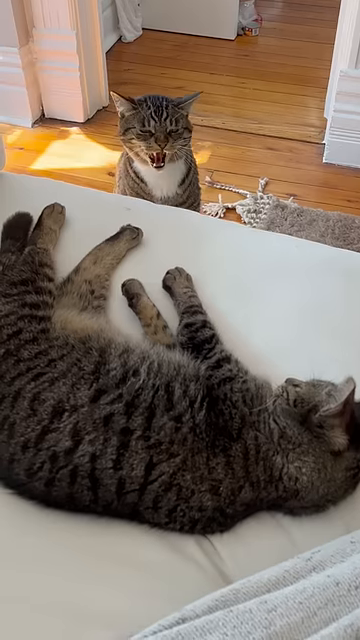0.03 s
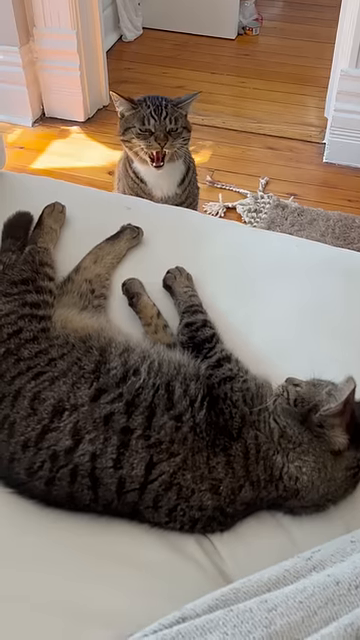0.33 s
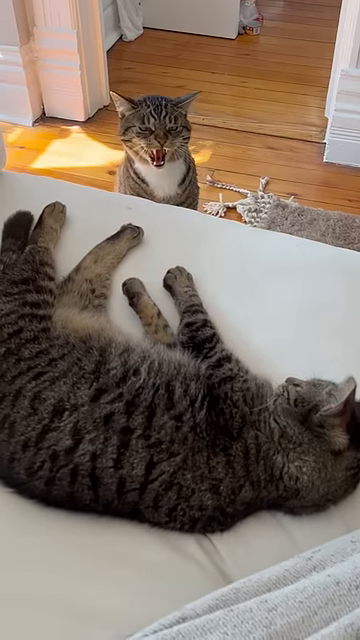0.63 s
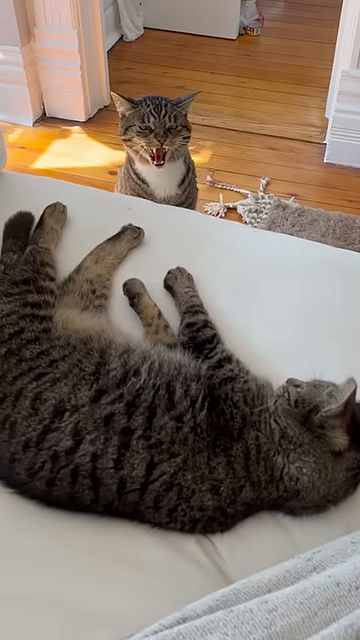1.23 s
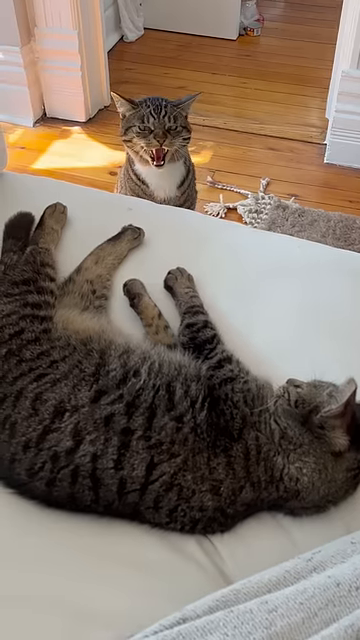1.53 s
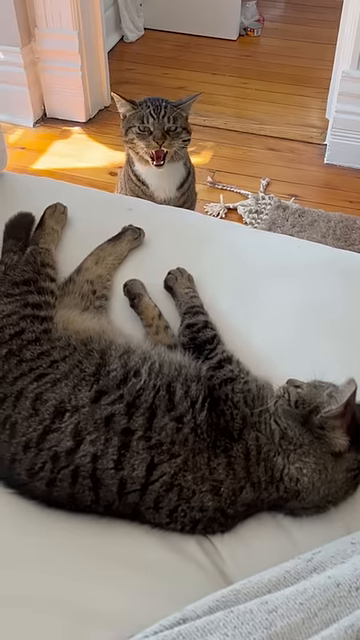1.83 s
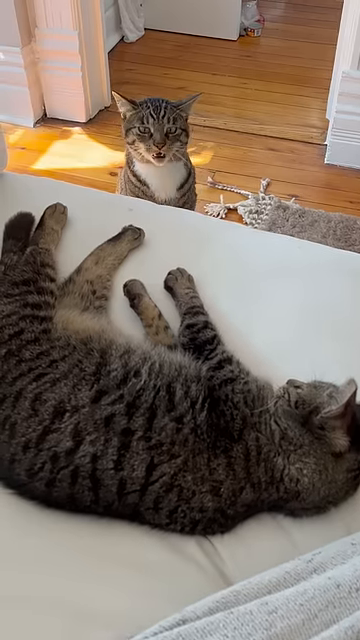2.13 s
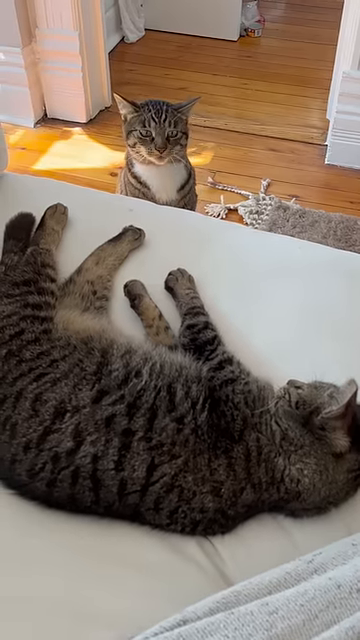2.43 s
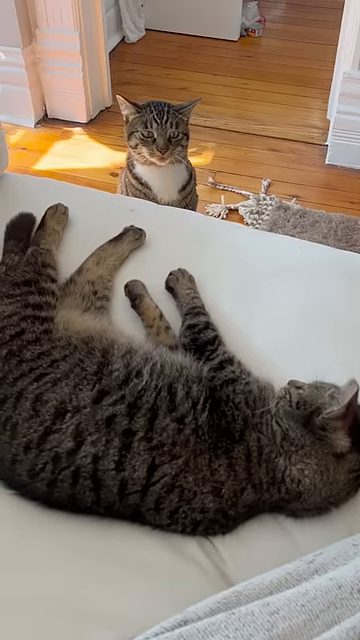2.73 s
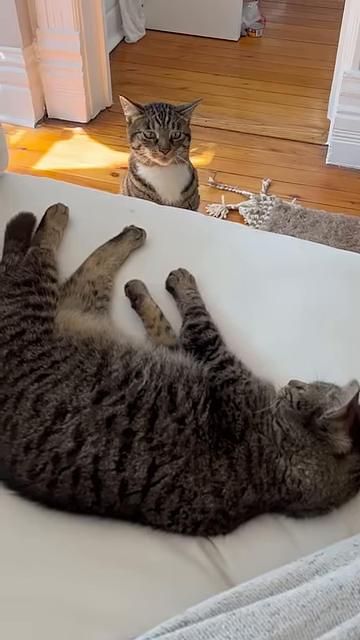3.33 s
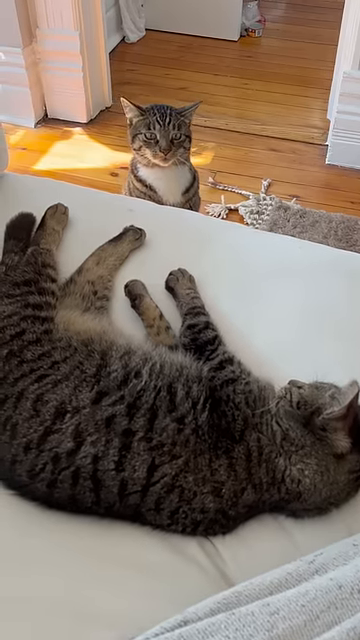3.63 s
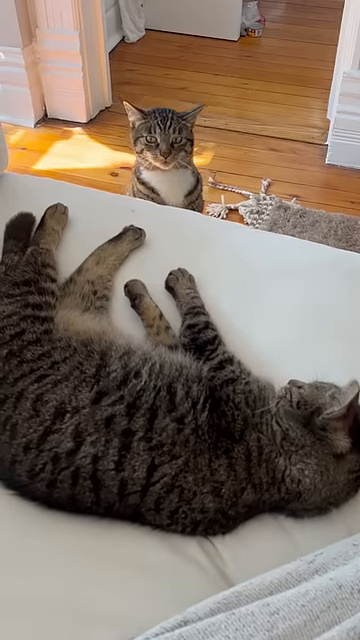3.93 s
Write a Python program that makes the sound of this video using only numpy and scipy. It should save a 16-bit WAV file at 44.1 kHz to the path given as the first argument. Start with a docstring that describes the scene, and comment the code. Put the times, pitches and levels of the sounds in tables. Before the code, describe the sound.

One long, breathy cat hiss with a wet sizzle, followed by a quiet room's low rumble.

```python
"""One long cat hiss

A cat hisses in a quiet room with a wooden floor, then shuts its mouth. Breath rushes through
the throat and the open mouth; saliva flutters in it, about sixty spits a second, and sizzles past
the teeth. The room rings briefly, leaving a low rumble, a faint drone and soft air noise."""
import sys
import numpy as np
from scipy import signal
from scipy.fft import rfft, irfft
from scipy.io import wavfile
from scipy.ndimage import map_coordinates

SR = 44100
rng = np.random.default_rng(int(sys.argv[2]) if len(sys.argv) > 2 else 0)


def log_audio(samples):
    """Write samples as a 16-bit WAV file to the path given in sys.argv[1]."""
    # one column per channel
    frames = np.atleast_2d(samples).T
    # limit to full scale, then quantise
    limited = np.clip(frames, -1, 1)
    pcm = np.round(limited * 32767).astype(np.int16)
    wavfile.write(sys.argv[1], SR, pcm)


N = 176400
T = np.arange(N) / SR
HZ = np.maximum(np.arange(N // 2 + 1) * SR / N, 1)
MOUTH_SHUT_S = 1.81


# Push of the breath, before each layer's trim: time_s, low_throat_db, upper_throat_db, mouth_db
BREATH_PUSH = [(0, -49.5, -59.5, -63), (.14, -50, -53, -62.5), (.21, -51.5, -55, -62), (.35, -51, -54, -62),
               (.53, -47.5, -51.5, -58.5), (.62, -50.5, -54.5, -59), (.77, -51, -55.5, -60.5),
               (.88, -51.5, -53, -59.5), (.97, -52.5, -58, -63), (1.11, -53, -53, -61),
               (1.21, -51.5, -57.5, -62.5), (1.31, -51, -55, -60.5), (1.39, -51, -62.5, -63.5),
               (1.47, -50.5, -52.5, -61.5), (1.55, -51.5, -60.5, -62.5), (1.66, -54, -54.5, -60.5),
               (1.73, -51, -51.5, -58.5), (1.8, -59, -59, -62)]
# Dark colour of the throat: frequency_hz, gain_db
THROAT_COLOUR = [(85, -6), (120, 5), (170, -6), (255, 0), (335, 0), (400, 0), (470, -1.5), (600, -4),
                 (790, -3.5), (950, -12.5), (1200, -16.5), (1450, -18.5), (1900, -32), (4000, -48),
                 (6500, -50)]

def throat(puffs, roughness=.28, split_hz=593):
    """A hollow rush from deep in the throat; its upper part swells when the cat pushes harder."""
    low_db, upper_db, _ = in_time(BREATH_PUSH)
    rush = coloured(rng.standard_normal(N) * (1 + roughness * puffs), THROAT_COLOUR)
    low = irfft(rfft(rush) / (1 + (HZ / split_hz) ** 10), N)
    rush = unit_power(low) * from_db(low_db + 2) + unit_power(rush - low) * from_db(upper_db - 1)
    unsteady_airflow = waver(depth_db=1.5, rate_hz=22.5)
    return rush * unsteady_airflow * release(t60_s=.3)


# Formants of the wide-open mouth: pitch_hz, width_hz, gain_db
MOUTH_FORMANTS = [(2020, 1520, 2.5), (2450, 620, 2), (2530, 250, -4), (2938, 290, -6.5), (3560, 250, -9)]

def mouth(puffs, roughness=.24):
    """Turbulence rings in the mouth's resonances, which flicker and stray as tongue and jaw tremble."""
    _, _, mouth_db = in_time(BREATH_PUSH)
    rush = sum(from_db(db) * waver(depth_db=1.7, rate_hz=54) * wander(noise_band(hz, width), share=.05)
               for hz, width, db in MOUTH_FORMANTS)
    return unit_power(rush * (1 + roughness * puffs)) * from_db(mouth_db + 1) * release(t60_s=.22)


# Ride of the sizzle and its topmost ring: time_s, sizzle_db, top_db, tilt_db_per_octave
SIZZLE_RIDE = [(0, -60, -55, -7), (.18, -64.5, -60, -3), (.42, -58, -55, -12), (.62, -57, -57, 0),
               (.76, -56.5, -55, -9), (.87, -55.5, -56, 0), (.98, -59, -55, 0), (1.12, -55.5, -56, 4),
               (1.36, -54.5, -53.5, 2.5), (1.54, -58, -62, 7), (1.68, -52, -63.5, 13), (1.78, -62, -70, 0)]
# Resonances of the gaps between the teeth: pitch_hz, width_hz, gain_db
TOOTH_GAPS = [(7500, 300, -7.5), (8160, 850, 2), (9650, 650, 4.5), (11100, 1200, -5), (12360, 380, 1),
              (13700, 540, -7.5)]

def teeth(puffs, accent_db, spit_tilt_db, low_edge_hz=7050, leak_db=-25.5):
    """Each puff spits noise through the teeth, with a colour of its own, over a steady fine spray."""
    sizzle_db, top_db, tilt_db = in_time(SIZZLE_RIDE)
    spits, spray = from_db(.5) * puffs, from_db(-5)
    spit_jets = spits * from_db(accent_db) * gap_shares(tilt_db + spit_tilt_db)
    jets = np.hypot(spit_jets, spray * gap_shares(tilt_db))
    rings = np.zeros(N)
    for jet, (hz, width, _) in zip(jets, TOOTH_GAPS):
        flicker = waver(depth_db=1.3, rate_hz=30)  # saliva keeps changing the gaps
        ring = wander(resonate(rng.standard_normal(N), hz, width), share=.008)
        rings += jet * flicker * unit_power(ring)
    bright = signal.sosfilt(signal.butter(20, low_edge_hz, "high", fs=SR, output="sos"), rings)
    flow = np.hypot(spits, spray)
    sizzle = bright + from_db(leak_db) * flow * rng.standard_normal(N)
    top_ring = flow * noise_band(hz=15470, width_hz=1400)
    return (sizzle * from_db(sizzle_db) + top_ring * from_db(top_db)) * release(t60_s=.025)


def gap_shares(tilt_db):
    """How the jet divides among the tooth gaps at a given tilt per octave; unit power."""
    gains = np.array([from_db(db + tilt_db * np.log2(hz)) for hz, _, db in TOOTH_GAPS])
    return gains / np.linalg.norm(gains, axis=0)


# Spits that stand out as wet ticks: start_s, accent_db, tilt_db_per_octave
WET_TICKS = [(.029, 0, -5), (0.186, 4, 15), (.217, 8.5, 10), (.381, 2, -10), (.422, 1.5, -11),
             (.511, 2, 25), (0.525, -3, -1), (0.728, -1, -7), (.744, 1, -6), (.843, 3.5, 8), (.881, 3, 9),
             (.898, 4, -17), (1.028, 2, 10), (1.094, 3, 10), (1.156, 0.5, 3), (1.271, -0.5, -20),
             (1.284, 0, -8), (1.383, 1.5, 9), (1.482, 1, -3), (1.517, 5, -6), (1.602, 1, -2), (1.616, 1, 4),
             (1.653, 0.5, 10), (1.685, -2, 8), (1.772, 1.5, 4)]

def flutter(rate_hz=62, jitter_cycles=.13, size_range_db=7, tilt_spread_db=7, puff_width_s=.0011):
    """Saliva flaps in the breath: uneven puffs in step with the wet ticks, plus their accent and tilt."""
    tick_s, tick_db, tick_tilt_db = np.transpose(WET_TICKS)
    marks_s = np.r_[0, tick_s, T[-1]]
    flaps_between = np.maximum(np.round(np.diff(marks_s) * rate_hz), 1)
    cycles = np.r_[0, np.cumsum(flaps_between)].astype(int)
    count, ticks = cycles[-1], cycles[1:-1]
    late, tilt_db = rng.standard_normal((count, 2)).T * [[jitter_cycles], [tilt_spread_db]]
    size_db, accent_db = -size_range_db * rng.random(count), np.zeros(count)
    late[ticks] = size_db[ticks] = 0  # ticks land on time and at full size
    accent_db[ticks], tilt_db[ticks] = tick_db, tick_tilt_db
    puff_s = np.interp(np.arange(count) + late, cycles, marks_s)
    clicks = np.zeros(N)
    clicks[(puff_s * SR).astype(int)] = from_db(size_db)
    lag_s = np.arange(-SR // 100, SR // 100) / SR
    puff_shape = 1 / np.cosh(lag_s / puff_width_s * np.pi / 2)
    puffs = unit_power(signal.fftconvolve(clicks, puff_shape, "same"))
    return puffs, np.interp(T, puff_s, accent_db), np.interp(T, puff_s, tilt_db)


def release(t60_s):
    """Full until the mouth shuts, then dying away."""
    return np.exp(-np.log(1000) * np.maximum(T - MOUTH_SHUT_S, 0) / t60_s)


def wander(x, share, rate_hz=9):
    """The pitch of a resonance strays as tongue and jaw move."""
    return map_coordinates(x, [np.cumsum(1 + share * drift(rate_hz))], mode="mirror")


# Stereo image of the cat, as the phase lead of left over right: frequency_hz, lead_rad
LEFT_LEAD = [(100, 0.3), (2200, -0.81), (2900, 1), (3600, 0.4), (5000, 1), (7400, -1.86), (11000, -1.12),
             (15800, -1.83)]

def room(x, wet_db, t60_s, predelay_s=.0023):
    """Direct sound reaches left and right, followed by the room's short diffuse tail."""
    arrivals = irfft(np.exp(.5j * over_hz(LEFT_LEAD) * np.array([[1], [-1]])), N)
    arrivals = np.roll(arrivals, 128, axis=1)[:, :257]  # short, centred impulse responses
    direct = np.array([signal.fftconvolve(x, side, "same") for side in arrivals])
    t = T[:SR // 2]
    tail = diffuse_noise()[:, :len(t)] * np.exp(-np.log(1000) * t / t60_s) * (t > predelay_s)
    tail /= np.linalg.norm(tail, axis=1, keepdims=True)
    wet = signal.fftconvolve(x[None], tail, axes=1)[:, :N]
    return (direct + from_db(wet_db) * wet) / np.hypot(1, from_db(wet_db))


# Low room modes, before the swell: pitch_hz, width_hz, level_db
ROOM_MODES = [(60.86, 18, -48.5), (42.4, 26, -57)]
# Swell of the building's rumble: time_s, gain_db
RUMBLE_SWELL = [(0, -3.5), (.33, 4.5), (.5, 1.5), (.85, -4.5), (1.08, 4), (1.3, -4), (1.65, -2.5),
                (2.0, 0.5), (2.18, 4), (2.3, -7), (2.5, 1.5), (2.83, -3), (2.9, 8.5), (2.96, -7.5),
                (3.02, -10), (3.14, 1.5), (3.35, -13), (3.75, 1), (4, -3)]

def rumble(unevenness=.4):
    """The building excites the low room modes; their chance beating is partly evened out."""
    modes = sum(from_db(db) * noise_band(hz, width) for hz, width, db in ROOM_MODES)
    envelope = np.sqrt(np.abs(signal.hilbert(modes)) ** 2 + unevenness * np.mean(modes ** 2))
    return unit_power(modes / envelope) * np.std(modes) * from_db(in_time(RUMBLE_SWELL)[0])


# Bands of the house drone, before the waver: pitch_hz, width_hz, level_db
DRONE_BANDS = [(228.7, 20.4, -66), (326, 39, -69.5)]

def drone():
    """The house drones faintly in two narrow bands that come and go."""
    bands = sum(from_db(db) * noise_band(hz, width) for hz, width, db in DRONE_BANDS)
    return bands * waver(depth_db=3, rate_hz=5.6)


# Colour of the room tone: frequency_hz, gain_db
AIR_COLOUR = [(25, -9.5), (90, 0.5), (122, -0.5), (145, -6.5), (240, -5), (280, -13.5), (340, -12),
              (390, -20.5), (510, -21.5), (800, -28.5), (1240, -32), (2500, -37.5), (6200, -40.5),
              (8500, -44), (10000, -50.5), (13000, -48), (14300, -79)]

def air(level_db=-53.5):
    """Faint, dark air noise fills the room."""
    return from_db(level_db) * coloured(diffuse_noise(), AIR_COLOUR)


# Likeness of left and right in the diffuse sound: frequency_hz, correlation
STEREO_LIKENESS = [(80, 0.97), (200, 0.9), (400, 0.11), (1000, 0.033), (4000, 0.47), (12000, 0.19)]

def diffuse_noise():
    """Noise from all around: alike on both sides in the bass, less so higher up."""
    alike = np.clip(over_hz(STEREO_LIKENESS), 0, 1)
    mid, side = rfft(rng.standard_normal((2, N)))
    return irfft(np.sqrt(1 + alike) * mid + np.sqrt(1 - alike) * side * [[1], [-1]], N)


def from_db(db):
    """Decibels to gain."""
    return 10 ** (np.asarray(db) / 20)


def unit_power(x):
    """Scale to an RMS of one."""
    return x / np.sqrt(np.mean(x ** 2) + 1e-20)


def in_time(rows):
    """Each column of an automation curve, sample by sample."""
    time_s, *columns = np.transpose(rows)
    return [np.interp(T, time_s, column) for column in columns]


def over_hz(points):
    """Points joined by straight lines over log frequency."""
    hz, value = np.transpose(points)
    return np.interp(np.log(HZ), np.log(hz), value)


def coloured(x, spectrum):
    """Give noise a colour that falls away below its lowest point; unit power."""
    gain = from_db(over_hz(spectrum)) * np.minimum(HZ / spectrum[0][0], 1) ** 4
    return unit_power(irfft(rfft(x) * gain, N))


def resonate(x, hz, width_hz):
    """One resonance with unit gain at its peak."""
    r = np.exp(-np.pi * width_hz / SR)
    feedback = [1, -2 * r * np.cos(2 * np.pi * hz / SR), r * r]
    return signal.lfilter(np.array([1, 0, -1]) * (1 - r * r) / 2, feedback, x)


def noise_band(hz, width_hz):
    """Noise sent twice through a resonance, already settled; unit power."""
    once = resonate(rng.standard_normal(N + SR), hz, width_hz)
    return unit_power(resonate(once, hz, width_hz)[SR:])


def drift(rate_hz):
    """Smooth random motion, mostly slower than rate_hz; unit power."""
    return unit_power(irfft(rfft(rng.standard_normal(N)) / (1 + (HZ / rate_hz) ** 2), N))


def waver(depth_db, rate_hz):
    """A gain that drifts at random around one."""
    return from_db(depth_db * drift(rate_hz))


def scene():
    """One flutter roughens all three layers of the hiss, over the bed of the quiet room."""
    puffs, accent_db, tilt_db = flutter()
    hiss = room(throat(puffs), wet_db=-3.5, t60_s=.27)
    hiss += room(mouth(puffs), wet_db=-5, t60_s=.27)
    hiss += room(teeth(puffs, accent_db, tilt_db), wet_db=-8.5, t60_s=.15)
    return hiss + rumble() + drone() + air()


def record(dry, fade_s=.008, cutoff_hz=15850):
    """Both ends fade quickly and the very top is cut steeply."""
    fades = np.clip(np.minimum(T, T[-1] - T) / fade_s, 0, 1)
    return signal.sosfilt(signal.ellip(12, .2, 80, cutoff_hz, fs=SR, output="sos"), dry * fades)


dry = scene()
out = record(dry)
log_audio(out)
```